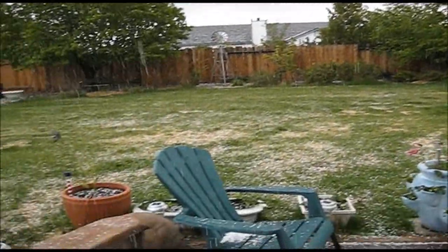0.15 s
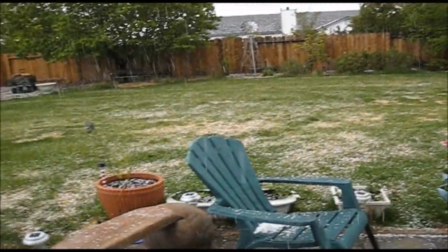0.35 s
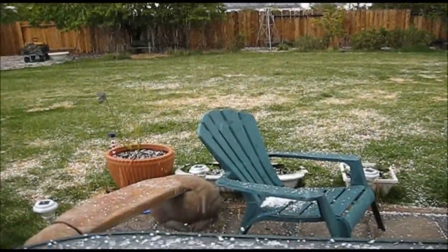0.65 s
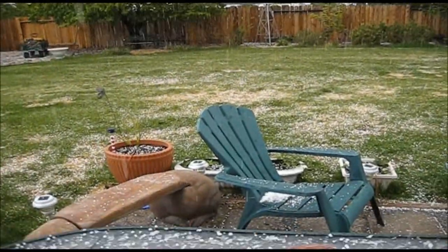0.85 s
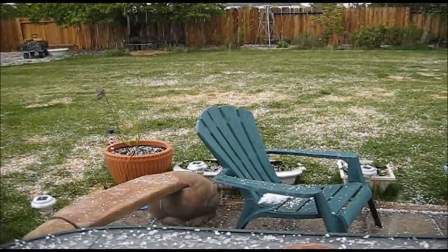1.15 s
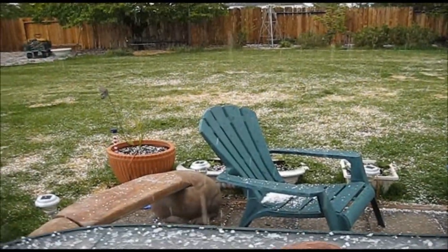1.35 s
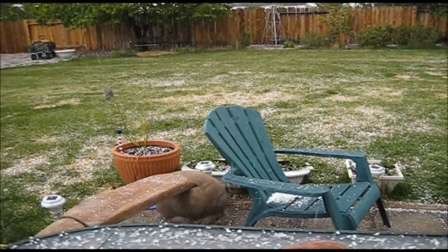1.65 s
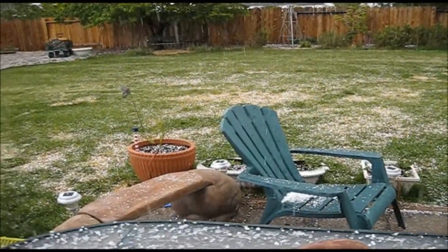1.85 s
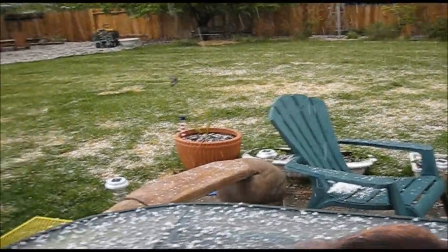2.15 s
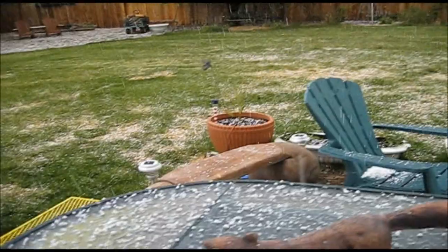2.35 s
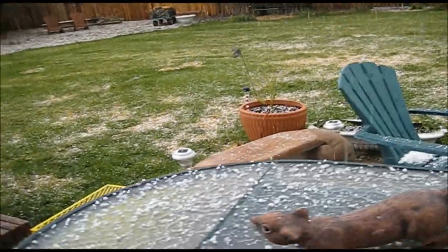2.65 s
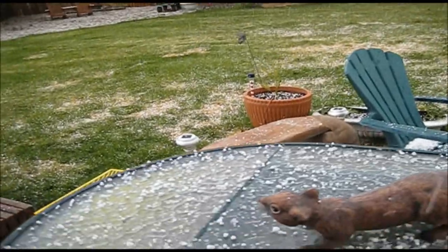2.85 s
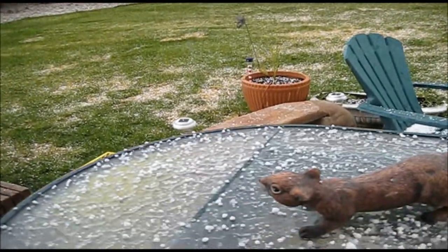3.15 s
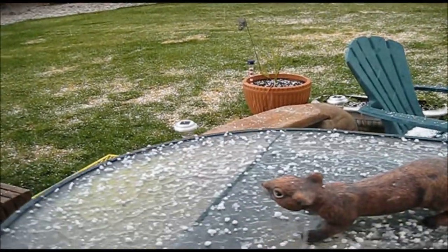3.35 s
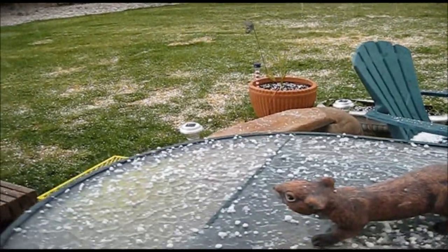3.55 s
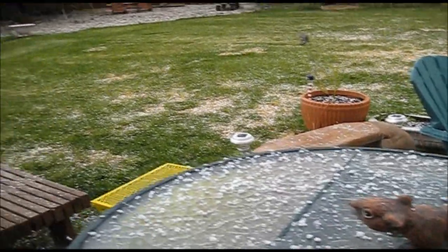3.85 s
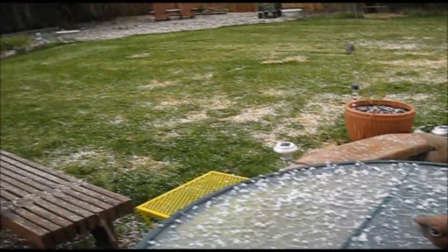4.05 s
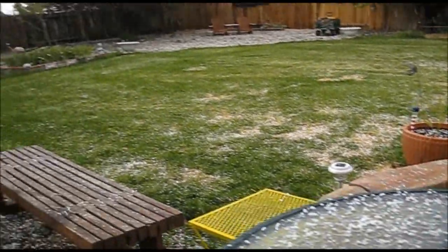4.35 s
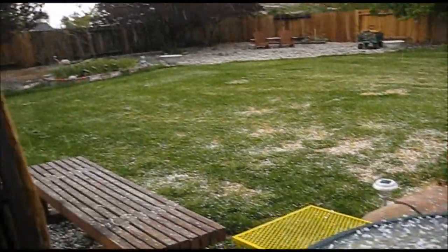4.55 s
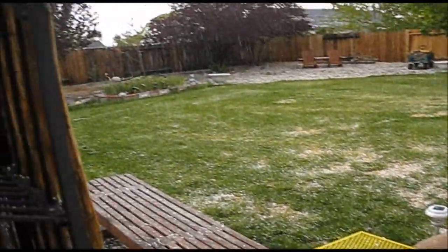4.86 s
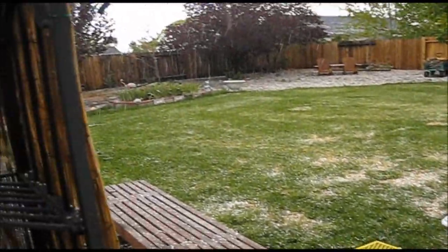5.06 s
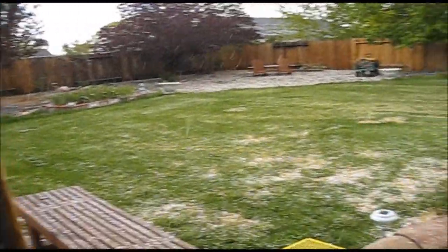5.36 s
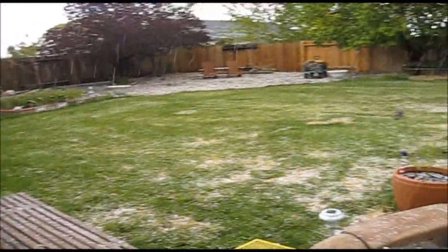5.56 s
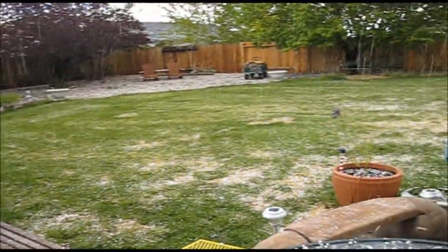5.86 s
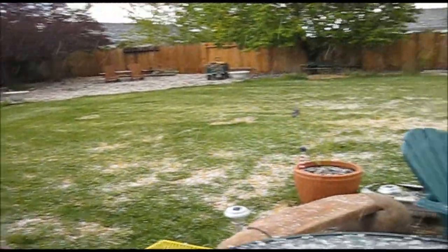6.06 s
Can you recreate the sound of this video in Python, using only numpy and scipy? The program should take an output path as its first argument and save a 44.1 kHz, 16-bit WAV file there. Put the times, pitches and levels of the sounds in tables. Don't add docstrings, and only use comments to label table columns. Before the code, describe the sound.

Small ice pellets patter and snap close by on stone, table top and wood, over a constant hiss of hail across grass.

```python
import sys
import numpy as np
from scipy import signal
from scipy.fft import rfft, irfft, next_fast_len
from scipy.io import wavfile
from scipy.ndimage import uniform_filter1d, minimum_filter1d, map_coordinates

SR = 44100
rng = np.random.default_rng(int(sys.argv[2]) if len(sys.argv) > 2 else 0)


def decibels_to_gain(level_db):
    exponent = np.asarray(level_db, float) / 20
    return 10 ** exponent


def generate_wav(signal):
    frames = np.transpose(np.atleast_2d(signal))
    scaled = np.clip(frames, -1, 1) * 32767
    pcm = np.round(scaled).astype(np.int16)
    wavfile.write(sys.argv[1], SR, pcm)


N = 273420
SPAN_SAMPLES = 2048

# time in seconds, far hiss in dB, near patter in dB.
SHOWER = [
    (0.0, -33.5, -27.5),
    (1.19, -33, -22.5),
    (2.23, -34.5, -22.5),
    (2.47, -33.5, -26.5),
    (4.61, -34, -32),
    (6.2, -34, -23),
]
# frequency in Hz, density in dB per Hz.
LAWN_SPECTRUM = [(25, -21), (180, -13.5), (680, -3.5), (2000, 0.5), (4800, -2.5), (9000, -10),
                 (16000, -11.5)]
# start in seconds, peak in dB.
STONE_TICKS = [(.079, -8), (.2367, -7), (.262, -4), (.341, -7), (.413, -6.5), (.4208, -9), (.6194, -6.5),
               (.6485, -8.5), (.6842, -1), (.7679, -5), (.8251, -1), (.945, -7), (1.1604, -4), (1.4225, -5),
               (1.7114, -3), (1.7624, -5.5), (1.866, -5.5), (2.121, -3), (2.5367, -6), (2.7433, -2.5),
               (3.6543, -5.5), (4.0446, -5), (4.114, -7.5), (4.5321, -7.5), (4.648, -1), (4.8296, -4),
               (5.0857, -6.5), (5.6453, -10), (5.7078, -6.5), (6.1252, -3.5)]
# start in seconds, peak in dB, tone in Hz.
TABLE_TICKS = [(.1236, -14, 3860), (0.139, -8, 4900), (0.9254, -4.5, 3400), (.9345, -4.5, 4180),
               (.961, -10, 3920), (1.193, -6, 3140), (1.348, -7, 3770), (1.3716, -8.5, 4970),
               (1.4912, -7, 4910), (1.5947, -6.5, 5430), (2.219, -5, 5030), (2.242, -3.5, 3700),
               (2.312, -6.5, 4730), (2.4255, -3, 5300), (2.7071, -7.5, 4400), (2.8258, -6.5, 4770),
               (3.056, -7.5, 3840), (3.18, -10, 4430), (3.3903, -3.5, 4400), (3.5404, -3, 4560),
               (3.6297, 0.5, 4100), (3.6995, -4, 6600), (3.7542, -4, 4230), (4.317, -7.5, 4350),
               (4.762, -1, 4800), (4.813, -5, 5100), (4.8824, -4.5, 5000), (5.0944, -9, 4900),
               (5.9117, -4, 4180), (6.1949, -6, 4620)]
# start in seconds, peak in dB, tone in Hz.
WOOD_TICKS = [(0.3162, -9.5, 4760), (.38, -12, 3970), (0.5025, -9, 4310), (.7866, -7, 5230),
              (0.9908, -6, 3740), (1.536, -5.5, 5320), (1.9747, -5, 4020), (2.141, -15, 5900),
              (2.339, -6, 4770), (2.38, -5, 5100), (2.4695, -8.5, 3400), (2.834, -4.5, 5900),
              (3.136, -9.5, 6200), (3.284, -10, 3600), (3.2924, -9, 6520), (3.3343, -12, 5170),
              (3.8333, -11.5, 2340), (4.037, -7, 4670), (4.2367, -4, 4770), (4.5723, -12, 2670),
              (4.5861, -7, 5540), (4.912, -7, 6100), (5.1098, -8, 5250), (5.206, -3, 5910),
              (5.5103, -10, 6640), (5.6719, -11, 5100), (5.8105, -10.5, 4960), (6.088, -5, 4930),
              (6.1702, -7, 5520)]
# start in seconds, peak in dB.
CRUMB_TICKS = [(.001, -10.5), (.184, -8), (.224, -8), (.3487, -9), (.404, -17), (.4906, -12.5),
               (.7484, -11), (1.26, -15), (1.4587, -7.5), (1.4863, -7.5), (1.5642, -9), (1.6844, -23),
               (1.9465, -9), (1.9943, -6), (2.077, -10), (2.171, -6), (2.435, -10), (2.7873, -9.5),
               (2.8736, -8), (3.2385, -10.5), (3.4333, -14), (3.7122, -6.5), (3.967, -10), (4.344, -5.5),
               (4.4858, -7), (4.7037, -10.5), (4.732, -10.5), (5.4962, -11), (5.897, -11)]
# start in seconds, peak in dB.
FAR_TABLE_TICKS = [(.149, -12), (0.163, -10), (0.4352, -9), (.5862, -12), (.8478, -7), (1.116, -18),
                   (1.2758, -11), (1.627, -11.5), (1.8155, -22), (2.0306, -11), (2.0422, -10),
                   (2.2709, -11), (2.5567, -8), (2.9673, -8), (3.0036, -12), (3.193, -12), (3.2134, -11),
                   (3.314, -9), (3.4795, -14), (4.0564, -8), (4.279, -11.5), (4.379, -9.5), (4.9602, -10.5),
                   (4.9754, -12), (5.1573, -13), (5.35, -25), (5.368, -14), (5.428, -20), (5.5547, -10),
                   (5.608, -10)]
# start in seconds, peak in dB, mode in Hz, t60 in seconds.
PINGS = [(0.404, -15, 11700, .1), (.475, -19.5, 6860, 0.12), (0.542, -14, 11540, 0.12),
         (.703, -18, 11700, .15), (1.056, -20, 4650, .05), (1.097, -13, 11540, 0.044),
         (1.099, -13, 10100, 0.038), (1.195, -20, 2515, 0.14), (1.259, -14, 11400, .04),
         (1.333, -23, 3930, .13), (1.537, -17, 9550, .045), (1.849, -25, 6720, .09),
         (2.804, -11, 6740, .025), (3.729, -21, 4830, 0.089), (3.858, -16.5, 4710, 0.061),
         (3.994, -25, 6340, .12), (4.346, -16, 11800, .1), (4.476, -25, 11710, .08),
         (5.023, -21, 10770, .13), (5.291, -13.5, 2540, 0.04), (5.488, -9, 11710, .04),
         (5.559, -15, 9700, .07), (5.673, -14.5, 4700, 0.09)]
# start in seconds, level in dB.
THUMPS = [
    (0.685, -27),
    (1.714, -34),
    (1.81, -28),
    (2.838, -30),
    (3.391, -31),
    (3.63, -29),
    (4.764, -26),
    (6.126, -24),
]
# start in seconds, peak in dB, tone in Hz.
KNOCKS = [(0.711, -14.5, 566), (0.72, -9.5, 1000), (0.874, -16, 990), (1.581, -15, 820),
          (1.974, -13.5, 1110), (2.58, -13.5, 910), (2.634, -12.5, 980), (3.262, -11.5, 800),
          (3.627, -13, 876), (3.86, -16.5, 1020), (5.745, -14.5, 1190), (6.022, -13, 1060)]
# start in seconds, level in dB, tone in Hz.
SLIDES = [
    (1.07, -28, 3660),
    (1.531, -11, 3720),
    (2.6, -5, 3430),
    (2.63, -7, 3000),
    (3.6, -8, 2800),
    (3.957, -7, 3060),
    (5.47, -15, 6500),
]
# frequency in Hz, gain in dB.
PORT_RESPONSE = [(6000, -4.5), (10000, 0), (11700, 2), (12600, -1.5), (15000, -13), (15800, -10.5)]

# shatter share in dB, t60 in seconds.
STONE, TABLE, WOOD, CRUMBS = (-3, .007), (-4, .015), (-13, .018), (-2.2, .065)
STONE_HZ, CRUMB_HZ = 4700, 4400


def unit(x):
    return x / np.sqrt(np.mean(x ** 2, axis=-1, keepdims=True) + 1e-20)


def along(points, hz):
    f, v = np.transpose(points)
    return np.interp(np.log(hz + 1), np.log(f + 1), v)


def wobble(rate_hz):
    knots = rng.standard_normal(int(N * rate_hz / SR) + 4)
    return map_coordinates(knots, [np.arange(N) * rate_hz / SR])


def filtered(x, response):
    m = next_fast_len(N + 8192)
    return irfft(rfft(x, m) * response(np.fft.rfftfreq(m, 1 / SR)), m)[..., :N]


def band(hz, centre_hz, width_hz):
    damping = 1j * hz * width_hz
    return damping / (centre_hz ** 2 - hz ** 2 + damping + 1e-9)


def fade(t60_s, rise_s, size):
    t = np.arange(size) / SR
    return (1 - np.exp(-t / rise_s)) * decibels_to_gain(-60 * t / np.maximum(t60_s, .002)[:, None])


def placed(times_s, rows):
    at = np.round(times_s * SR).astype(int)[:, None] + np.arange(rows.shape[1])
    return np.bincount(at.ravel(), rows.ravel(), N + SR)[:N]


def click(cycles):
    return np.sin(2 * np.pi * cycles) * cycles * np.exp(-cycles)


def impacts(tone_hz, shatter, t60_s, sharp, rise_s, size):
    hz = np.fft.rfftfreq(size, 1 / SR)
    noise = rfft(rng.standard_normal((len(t60_s), 2, size)))
    crack = fade(np.minimum(t60_s, .008), rise_s, size)
    shape = crack + decibels_to_gain(-8) * fade(t60_s, .003, size)
    strength = np.sqrt(np.mean(shape ** 2, axis=1, keepdims=True))
    body = band(hz, tone_hz[:, None], tone_hz[:, None] / sharp)
    surface = unit(shape * irfft(noise[:, 0] * body, size))
    ice = unit(shape * irfft(noise[:, 1] * band(hz, 11300, 12300) ** 2, size))
    share = np.clip(shatter, .02, .97)[:, None]
    return strength * (np.sqrt(1 - share ** 2) * surface + share * ice)


def shower():
    s, hiss_db, patter_db = np.transpose(SHOWER)
    t = np.arange(N) / SR
    z = signal.stft(rng.standard_normal(N), nperseg=256)[2]
    field = uniform_filter1d(uniform_filter1d(rng.standard_normal(z.shape), 8, 0), 8, 1)
    patchy = signal.istft(z * decibels_to_gain(1.37 * field / field.std()), nperseg=256)[1][:N]
    hiss = unit(filtered(patchy, lambda hz: decibels_to_gain(along(LAWN_SPECTRUM, hz))))

    start, size, tone, shatter, decay = rng.random((int(900 * N / SR), 5)).T
    size_db = np.minimum(-4.5 * np.log(size + 1e-9), 14)
    t60_s = .003 + .012 * decay ** 3
    rows = impacts(2200 * 3.7 ** tone, 0.19 + 0.69 * shatter, t60_s, sharp=3.1, rise_s=0.000061, size=512)
    patter = unit(placed(start * N / SR, decibels_to_gain(size_db)[:, None] * rows))

    swell_db = .8 * wobble(16)
    hiss_gain = decibels_to_gain(np.interp(t, s, hiss_db) + 11.0 + swell_db)
    return hiss_gain * hiss + decibels_to_gain(np.interp(t, s, patter_db) - 2) * patter


def spikes():
    draw = rng.random((int(220 * N / SR), 3))
    cycles = (3000 * 4 ** draw[:, 1:2]) * np.arange(128) / SR
    size = decibels_to_gain(np.minimum(-11 - 4 * np.log(draw[:, 2:] + 1e-9), 1.5))
    return placed(draw[:, 0] * N / SR, size * click(cycles))


def ticks():
    def on(rows, surface, tone_hz=None):
        s, db, *hz = np.transpose(rows)
        hz = hz[0] if hz else tone_hz * np.exp(.13 * rng.standard_normal(len(s)))
        return np.array([s, db, hz, surface[0] + 0 * s, surface[1] + 0 * s])

    s, db, hz, shatter_db, t60_s = np.hstack([
        on(STONE_TICKS, STONE, STONE_HZ), on(TABLE_TICKS, TABLE), on(WOOD_TICKS, WOOD),
        on(CRUMB_TICKS, CRUMBS, CRUMB_HZ), on(FAR_TABLE_TICKS, TABLE, STONE_HZ)])
    rows = impacts(hz, decibels_to_gain(shatter_db), t60_s, sharp=3, rise_s=.00035, size=SPAN_SAMPLES)
    return placed(s, decibels_to_gain(db + 4)[:, None] * rows)


def snaps():
    near = TABLE_TICKS + WOOD_TICKS + CRUMB_TICKS + FAR_TABLE_TICKS
    s, db = np.transpose([row[:2] for row in near])
    cycles = STONE_HZ * np.exp(.3 * rng.standard_normal((len(s), 1))) * np.arange(128) / SR
    snap_db = -6
    return placed(s + .0004, decibels_to_gain(db + snap_db + 7)[:, None] * click(cycles))


def porch(x):
    size = SPAN_SAMPLES * 2
    tail = rng.standard_normal(size) * fade(np.array([.07]), 0.0025, size)[0]
    return signal.fftconvolve(x, tail / np.linalg.norm(tail))[:N]


def ringing(s, db, hz, t60_s, rise_s):
    size = 2 * SPAN_SAMPLES
    drift = np.cumsum(rng.standard_normal((len(s), size)), axis=1)
    phase = 2 * np.pi * hz[:, None] * np.arange(size) / SR + .03 * drift
    return placed(s, decibels_to_gain(db)[:, None] * np.sin(phase) * fade(t60_s, rise_s, size))


def pings():
    s, db, hz, t60_s = np.transpose(PINGS)
    port_db = 20 * np.log10(np.abs(port(hz)))
    return ringing(s, db - 1 - port_db, hz, t60_s, rise_s=0.00063)


def thumps():
    s, db = np.transpose(THUMPS)
    u = np.arange(SPAN_SAMPLES) / SR / 0.0003
    return placed(s - .0005, decibels_to_gain(db + 4.5)[:, None] * u * np.exp(1 - u))


def knocks():
    s, db, hz = np.transpose(KNOCKS)
    rows = impacts(hz, 0 * hz, 30 / hz, sharp=1.6, rise_s=.001, size=SPAN_SAMPLES)
    return placed(s, decibels_to_gain(db + 4.5)[:, None] * rows)


def slides():
    s, db, hz = np.transpose(SLIDES)
    shatter, t60_s = 0.58 + 0 * s, 0.19 + 0 * s
    rows = impacts(hz, shatter, t60_s, sharp=3.8, rise_s=0.0037, size=2 * SPAN_SAMPLES)
    return placed(s, decibels_to_gain(db)[:, None] * rows)


def scene():
    near = ticks() + pings() + knocks() + slides()
    return (shower() + spikes() + thumps() + near + decibels_to_gain(-10) * porch(near) + snaps())[None]


def port(hz):
    notch = 1 - .97 * band(hz, centre_hz=7900, width_hz=1700)
    return decibels_to_gain(along(PORT_RESPONSE, hz)) * notch


def ducked(x, top_db, slope, late_ms, release_s):
    over_db = np.maximum(20 * np.log10(np.abs(x) + 1e-9) - top_db, 0)
    held_db = -minimum_filter1d(-over_db, size=300, origin=149)
    late_samples = int(max(late_ms, 2.5) * SR / 1000)
    late_db = np.pad(held_db, (late_samples, 0))[:N]
    keep = np.exp(-1 / (release_s * SR))
    cut_db = signal.lfilter([1 - keep], [1, -keep], late_db)
    return x * decibels_to_gain(-slope * cut_db)


def low_pass(x):
    return signal.sosfilt(signal.butter(12, 16500, fs=SR, output="sos"), x)


def record(dry):
    x = ducked(filtered(dry[0], port), top_db=-6, slope=4.0, late_ms=4.7, release_s=0.019)
    x = x / (1 + np.abs(x / 1.25) ** 6) ** (1 / 6)
    mix = filtered(x, lambda hz: hz < 15770)[None]
    return low_pass(mix)


dry = scene()
out = record(dry)
generate_wav(out)
```